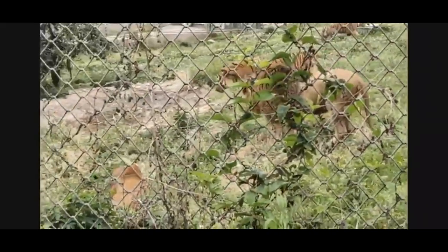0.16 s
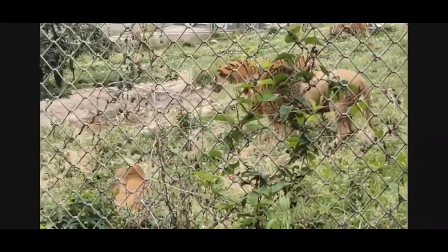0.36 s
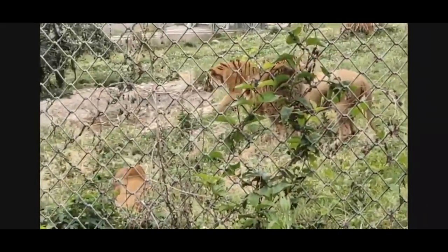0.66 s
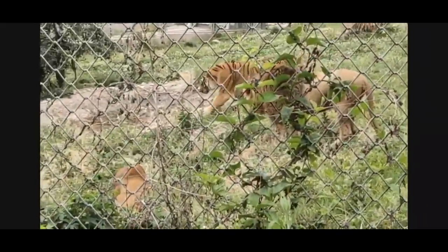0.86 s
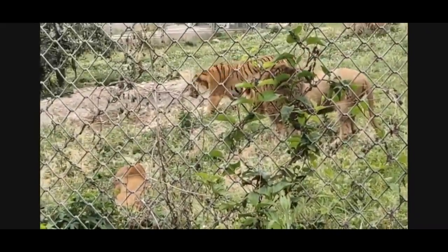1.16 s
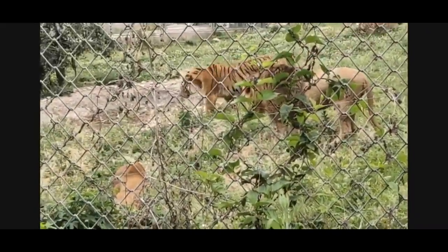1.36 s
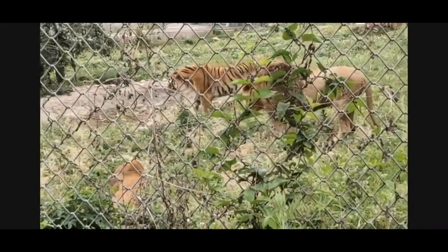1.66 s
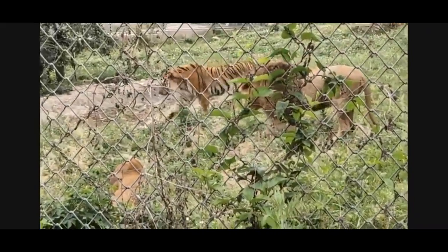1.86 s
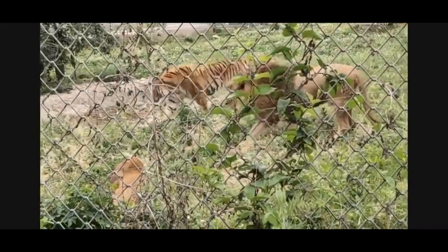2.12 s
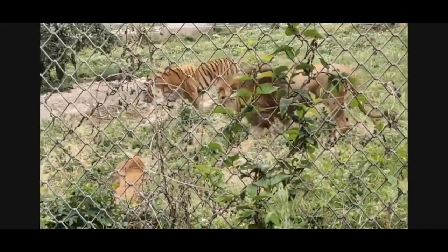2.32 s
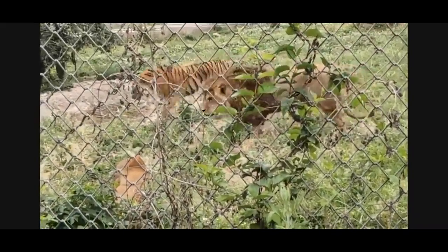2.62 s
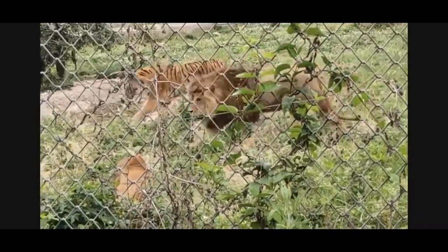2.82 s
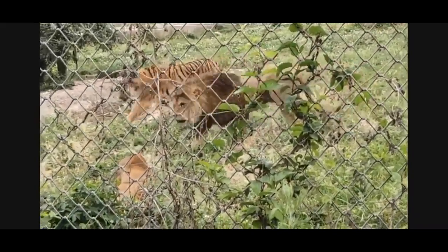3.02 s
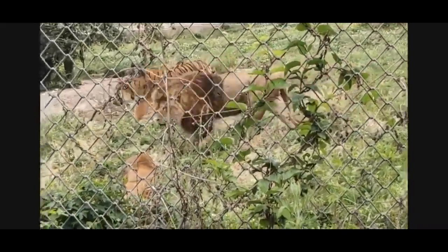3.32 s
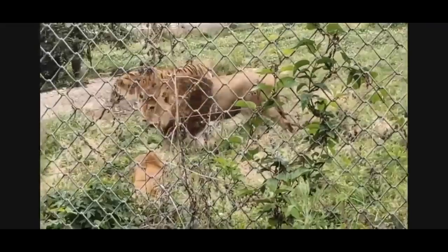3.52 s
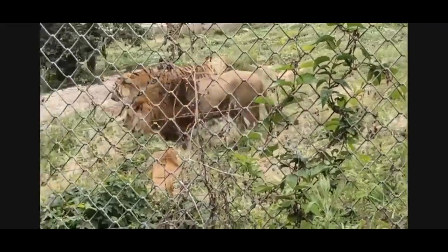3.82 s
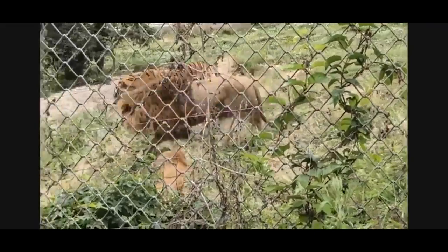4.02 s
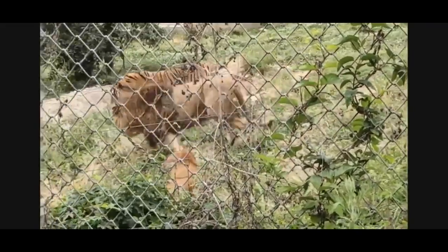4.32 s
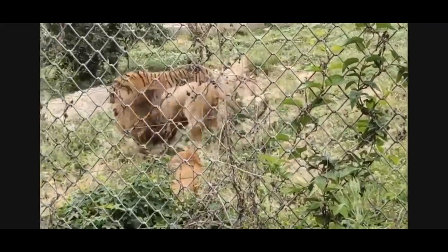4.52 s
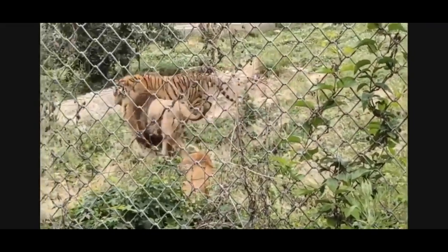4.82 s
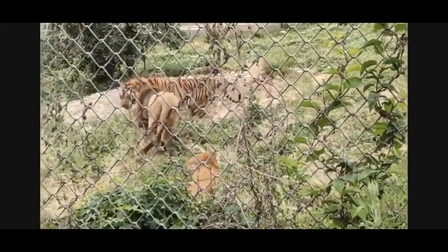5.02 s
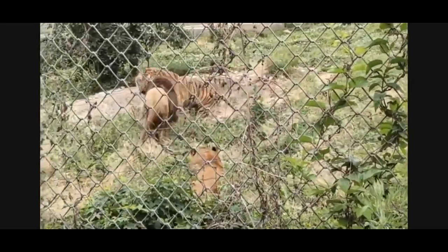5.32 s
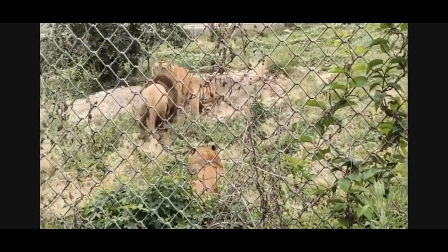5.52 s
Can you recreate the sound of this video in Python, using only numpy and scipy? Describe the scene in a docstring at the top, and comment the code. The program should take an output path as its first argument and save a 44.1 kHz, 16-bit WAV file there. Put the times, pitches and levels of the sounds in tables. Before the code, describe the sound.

Low, chesty lion grunts repeat under faint bird whistles, a hoarse moaning breath follows, then a fast snarl and an open roar cut short.

```python
"""A lion and a tiger face off in a grassy enclosure, with far birds whistling under open air and faint hiss.
Six rattling grunts come first, from slack vocal folds flapping about 28 times a second into a long throat.
Rasping in-breaths part them, air pulsed by a fluttering palate; one long breath turns into a hoarse moan.
Then the flaps quicken into a harsh snarl, and the last half second opens into a rough, pitched roar.
The enclosure answers the voices with a short echo of decaying noise."""
import sys
import numpy as np
from scipy import signal
from scipy.fft import rfft, irfft, next_fast_len
from scipy.io import wavfile
from scipy.ndimage import map_coordinates

SR = 44100
rng = np.random.default_rng(int(sys.argv[2]) if len(sys.argv) > 2 else 0)


def store_pcm(level_fs):
    """Save levels as 16-bit WAV."""
    pcm = np.round(np.clip(level_fs, -1, 1) * 32767).astype(np.int16)
    wavfile.write(sys.argv[1], SR, np.atleast_2d(pcm).T)


N = 250047  # samples, 5.67 s

# grunts: (first flap/s, end/s, flaps/Hz, chest crest/dB, throat crest/dB, mouth crest/dB)
GRUNTS = [(-.253, .13, 27, -35, -45, -49), (.591, 1.02, 28.1, -35.5, -45.5, -53),
          (1.519, 1.96, 27.9, -38.5, -49.5, -50.5), (2.321, 2.69, 27.6, -37.5, -44.5, -47),
          (3.107, 3.39, 27.1, -35.5, -47, -45), (3.979, 4.39, 28.6, -32.5, -44.5, -48.5)]
# the thump of the chest: (f/Hz, width of one pass/Hz, gain/dB)
CHEST = [(111, 54, 0)]


def amp(db):
    """Decibels to gain."""
    return 10 ** (np.asarray(db) / 20)


def clock():
    """The time of every sample in seconds."""
    return np.arange(N) / SR


def along(points, hz):
    """(f/Hz, value) points read on a log frequency axis."""
    f, v = np.transpose(points)
    return np.interp(np.log(hz + 1), np.log(f), v)


def noise():
    """White noise."""
    return rng.standard_normal(N)


def wobble(rate):
    """A smooth random curve with rate knots a second."""
    knots = rng.standard_normal(int(N * rate / SR) + 4)
    return map_coordinates(knots, [clock() * rate])


def filtered(x, response):
    """x times a complex response of frequency."""
    m = next_fast_len(N + SR // 2, True)
    return irfft(rfft(x, m) * response(np.fft.rfftfreq(m, 1 / SR)), m)[:N]


def coloured(x, spectrum, size=8192):
    """A causal filter with the given (f/Hz, gain/dB) shape, made minimum-phase by folding its cepstrum."""
    gain = amp(along(spectrum, np.fft.rfftfreq(size, 1 / SR)))
    cepstrum = irfft(np.log(gain + 1e-6))
    cepstrum[1:size // 2] *= 2
    cepstrum[size // 2 + 1:] = 0
    impulse = irfft(np.exp(rfft(cepstrum)))
    return signal.fftconvolve(x, impulse)[:N]


def resonate(x, modes):
    """Parallel resonances, each acting twice so that the valleys between them stay dark."""
    def response(f):
        return sum(amp(db) * (1j * f * w / (c * c - f * f + 1j * f * w)) ** 2 for c, w, db in modes)
    return filtered(x, response)


def played(layers, efforts, calls, rise=0.01):
    """In every call each layer swells to a crest, sags while it is held, then falls away."""
    t, out = clock(), np.zeros(N)
    for start, end, *levels in calls:
        inside = (t > start - rise) & (t < end + .02)
        age = t[inside] - start
        fade = np.interp(t[inside], [start - rise, start, end, end + .02], [0, 1, 1, 0])
        for x, (swell_db, crest, hold, sag_db, release), db in zip(layers, efforts, levels):
            effort_db = np.interp(age, [0, crest, crest + hold], [-swell_db, 0, -sag_db])
            effort_db = effort_db - release * np.maximum(age - crest - hold, 0)
            # even out the layer within this call before its level is set
            level = x[inside] / (x[inside].std() + 1e-12)
            out[inside] += level * fade * amp(db + effort_db)
    return out


def strikes(times, sizes):
    """Impulses at the given times."""
    places = np.clip(np.round(times * SR).astype(int), 0, N - 1)
    return np.bincount(places, sizes * (times >= 0), N)


def puffs(pulses, life):
    """Every pulse lets through a burst of turbulent air that dies away over life seconds."""
    t = np.arange(SR // 8) / SR
    fall = np.exp(-t / life)
    return signal.fftconvolve(pulses, fall / np.linalg.norm(fall))[:N] * noise()


def flaps(runs, scatter, scatter_db):
    """Slow slaps of the vocal folds, uneven in time by scatter seconds and in strength."""
    times = np.concatenate([np.arange(start, end, 1 / rate) for start, end, rate, *_ in runs])
    late, size = rng.standard_normal((len(times), 2)).T
    return strikes(times + scatter * late, amp(scatter_db * size))


def buzz(pitch_hz, jitter, scatter_db, alternate_db=0):
    """Pulses at an unsteady pitch; strong and weak ones may alternate."""
    cycles = np.cumsum(pitch_hz * np.exp(jitter * wobble(120))) / SR
    times = np.flatnonzero(np.diff(np.floor(cycles))) / SR
    size_db = scatter_db * rng.standard_normal(len(times))
    size_db = size_db + alternate_db * (np.arange(len(times)) % 2)
    return strikes(times, amp(size_db))


def glides(rows, waver, waver_rate):
    """Wavering sine tones that slide in pitch as they swell and fade."""
    t, out, drift = clock(), np.zeros(N), 1 + waver * wobble(waver_rate)
    for start, end, from_hz, to_hz, db in rows:
        inside = (t > start) & (t < end)
        u = (t[inside] - start) / (end - start)
        pitch_hz = (from_hz + (to_hz - from_hz) * u) * drift[inside]
        phase = 2 * np.pi * np.cumsum(pitch_hz) / SR
        out[inside] += np.sqrt(2) * amp(db) * np.sin(np.pi * u) * np.sin(phase)
    return out


def shifting(x, depth_db, width_hz, hold, size=200):
    """Narrow peaks and dips of colour come and go, each lasting about hold seconds."""
    hz, t, z = signal.stft(x, SR, nperseg=1024)
    grid = np.meshgrid(hz / width_hz, t / hold, indexing="ij")
    field = map_coordinates(rng.standard_normal((size, size)), grid, mode="wrap")
    return signal.istft(z * amp(depth_db * np.tanh(field)), SR, nperseg=1024)[1][:N]


def echo(x, decay):
    """A diffuse tail, 10 ms late, in which each frequency dies at its own speed."""
    hz, t, z = signal.stft(rng.standard_normal(SR // 2), SR, nperseg=256)
    fall = amp(-60 * t / along(decay, hz)[:, None])
    tail = signal.istft(z * fall, SR, nperseg=256)[1]
    return signal.fftconvolve(x, np.pad(tail, (SR // 100, 0)) / np.linalg.norm(tail))[:N]


def grunts():
    """Each flap thumps the chest; smaller wet flutters between flaps rattle in throat and mouth."""
    # throat with the jaw closed: (f/Hz, width of one pass/Hz, gain/dB)
    closed_throat = [(350, 33, 8.5), (379.6, 49.6, 12.5), (463, 30, -35)]
    # colour of the mouth: (f/Hz, relative level/dB)
    mouth_colour = [(360, -32), (620, -25), (725, -1.5), (897, -19.5), (1010, 4), (1200, 4), (1440, 3.5),
                    (1620, -5.5), (2010, -7), (2430, -13), (3510, -11.5), (6150, -28), (9000, -32),
                    (11700, -29), (19800, -120)]
    # effort of chest, throat, mouth: (swell/dB, time to crest/s, hold/s, sag over hold/dB, release/(dB/s))
    grunt_effort = [(4.5, .11, .15, 6, 125), (-5, .07, .19, 7.5, 230), (2, .11, .13, 9, 130)]
    # pushes within a grunt: (rate/Hz, depth/dB, first peak/s)
    throat_surge = (8.2, 3.5, .015)
    # the same columns for the mouth
    mouth_surge = (10.5, 3, .015)

    beat = flaps(GRUNTS, scatter=.0015, scatter_db=1.3)
    rattle = buzz(95, jitter=.35, scatter_db=-1)
    chest = resonate(opening(beat) + amp(-17) * rattle, CHEST)
    flow = beat + amp(-2) * puffs(beat, life=.018) + amp(-10) * rattle
    # the throat's resonance sinks as the jaw closes
    gape = jaw(closing=0.061)
    open_throat = resonate(flow, [(350, 110, 0), (492, 58, 1.5)])
    throat = gape * open_throat + (1 - gape) * resonate(flow, closed_throat)
    # air tears loose around each flap, early or late and of uneven strength
    torn = flaps(GRUNTS, scatter=.004, scatter_db=2.5)
    rasp = amp(-22) * beat + puffs(torn, life=.021) + amp(-13) * puffs(rattle, life=.004)
    # tongue and lips keep moving, so the colour changes from flap to flap
    throat = shifting(throat, depth_db=6, width_hz=80, hold=.07)
    mouth = shifting(coloured(rasp, mouth_colour), depth_db=7.5, width_hz=120, hold=.045)
    calls = [(start, end, *levels) for start, end, rate, *levels in GRUNTS]
    layers = [chest, throat * surge(*throat_surge), mouth * surge(*mouth_surge)]
    return played(layers, grunt_effort, calls)


def opening(beat):
    """The push of air comes 3 ms before the folds slap shut."""
    return np.roll(beat, -round(.003 * SR))


def jaw(closing):
    """Mouth opening, 1 at the start of each grunt and falling towards 0 over closing seconds."""
    return np.exp(-np.abs(grunt_age()) / closing)


def surge(rate, depth_db, first_peak):
    """The gain of the repeated pushes of breath within a grunt."""
    return amp(depth_db * np.cos(2 * np.pi * rate * (grunt_age() - first_peak)))


def grunt_age():
    """Seconds since the latest grunt began."""
    t, starts = clock(), np.array(GRUNTS)[:, 0]
    latest = np.maximum(np.searchsorted(starts, t) - 1, 0)
    return t - starts[latest]


def snarl():
    """Harder pressure: the folds flap faster and break into chaotic pulses."""
    # runs of fold flaps: (first flap/s, end/s, flaps/Hz)
    snarl_runs = [(4.708, 4.96, 35.3), (4.979, 5.22, 34.8)]
    # colour of the mouth: (f/Hz, relative level/dB)
    mouth_colour = [(360, -8), (620, -11), (1060, 4.5), (1700, -12), (2170, -5), (2600, -14.5),
                    (4070, -13.5), (5380, -25), (9000, -24.5), (11700, -71), (19800, -120)]
    # effort of chest, throat, mouth: (swell/dB, time to crest/s, hold/s, sag over hold/dB, release/(dB/s))
    snarl_effort = [(3, .07, .37, 7.5, 130), (8, .15, .29, 9.5, 200), (4, .25, .19, 3, 120)]
    # the call: (start/s, end/s, chest crest/dB, throat crest/dB, mouth crest/dB)
    snarl_call = (4.708, 5.23, -29.5, -30.5, -49)

    beat = flaps(snarl_runs, scatter=0.00114, scatter_db=-0.5)
    rattle = buzz(115, jitter=.2, scatter_db=4)
    chest = resonate(opening(beat) + amp(-11.5) * rattle, [(112.7, 50, 0)])
    throat_modes = [(252, 40, -13), (370.4, 102, 8.5), (454, 32, 1.5)]
    throat = resonate(beat + amp(-6) * rattle, throat_modes)
    rasp = amp(-9) * beat + puffs(beat, life=0.019) + amp(-9.5) * puffs(rattle, life=0.0084)
    throat = shifting(throat, depth_db=5, width_hz=80, hold=.06)
    mouth = shifting(coloured(rasp, mouth_colour), depth_db=7, width_hz=110, hold=.06)
    return played([chest, throat, mouth], snarl_effort, [snarl_call])


def roar():
    """The jaws open wide: a rough, pitched voice with a half-pitch undertone and air torn once a cycle."""
    # pitch before jitter: (t/s, f/Hz)
    roar_pitch = [(5.33, 134.7), (5.4, 146.1), (5.451, 158.7), (5.502, 146.7), (5.56, 141.5),
                  (5.619, 136.8)]
    # colours of chest, throat and mouth, each: (f/Hz, relative level/dB)
    chest_colour = [(24, -49), (40, -20), (56, -19), (107, -1), (145, -3), (205, -2), (280, -9), (360, -37),
                    (620, -120)]
    throat_colour = [(150, -56.5), (260, -12.5), (323, -3), (426, -0.5), (585, -18), (702, -10.5),
                     (820, -12), (902, -25), (980, -18.5), (1270, -61), (2160, -120)]
    mouth_colour = [(560, -30), (950, -11.5), (1200, 3), (1320, -4.5), (1460, -3.5), (2240, -8.5),
                    (2700, -13.5), (3140, -8), (4530, -15), (9000, -31), (11700, -73), (19800, -120)]
    # effort of chest, throat, mouth: (swell/dB, time to crest/s, hold/s, sag over hold/dB, release/(dB/s))
    roar_effort = [(21, .16, .22, -.5, 50), (24, .11, .29, -2, 10), (17, .2, .2, -1, 30)]
    # the call: (start/s, end/s, chest crest/dB, throat crest/dB, mouth crest/dB)
    roar_call = (5.23, 5.67, -27, -33, -43)

    pitch_hz = np.interp(clock(), *np.transpose(roar_pitch))
    # every second pulse is stronger, which sounds the undertone
    pulses = buzz(pitch_hz, jitter=.05, scatter_db=1.5, alternate_db=6)
    chest = coloured(pulses + amp(-9) * puffs(pulses, life=.006), chest_colour)
    throat = coloured(pulses + amp(-4) * puffs(pulses, life=.005), throat_colour)
    mouth = coloured(amp(-7) * pulses + puffs(pulses, life=.009), mouth_colour)
    mouth = shifting(mouth, depth_db=4, width_hz=100, hold=.08)
    return played([chest, throat, mouth], roar_effort, [roar_call])


def slaps():
    """Now and then the folds shut hard: a knock in the throat and a crack in the mouth."""
    # hard slaps: (t/s, relative throat level/dB, relative mouth level/dB)
    hard_slaps = [(0.668, -38, -42), (0.842, -36, -43), (1.519, -35, -34.5), (1.591, -39, -41),
                  (2.322, -36, -44), (2.357, -34, -36), (3.106, -33, -35), (4.253, -36, -45),
                  (4.849, -21, -48), (4.871, -23, -45), (4.979, -22, -31), (5.093, -29, -45)]
    # colour of the crack: (f/Hz, gain/dB)
    crack_colour = [(500, -32), (800, -21), (1100, 13.5), (1500, 4.5), (2200, -23.5), (4200, -28),
                    (7000, -46)]

    s, throat_db, mouth_db = np.transpose(hard_slaps)
    knock = resonate(strikes(s, amp(throat_db + 32)), [(380, 320, 0)])
    crack = strikes(s, amp(mouth_db + 17.5))
    return knock + coloured(crack + amp(10) * puffs(crack, life=0.012), crack_colour)


def lead_in():
    """A lone soft flap ahead of a grunt thumps only the chest."""
    # the flap: (t/s, peak level/dB)
    soft_flap = (1.489, -36)
    s, db = soft_flap
    thump = resonate(strikes(np.array([s]), 1), CHEST)
    return amp(db) * thump / np.abs(thump).max()


def breaths():
    """The cat drags air in past a fluttering palate; one long breath turns into a hoarse moan."""
    # in-breaths: (start/s, flutter crest/dB, air crest/dB)
    in_breaths = [(.26, -69, -70), (.41, -44, -55), (1.335, -62, -65), (2.15, -59, -58),
                  (2.935, -56, -58.5), (4.495, -39, -45.5)]
    # the long breath: (start/s, end/s, flutter crest/dB, air crest/dB)
    moan_call = (3.41, 3.955, -59, -52)
    # colours of flutter, drawn air and moan, each: (f/Hz, relative level/dB)
    flutter_colour = [(30, -25), (105, -8), (145, -2), (300, -36), (600, -74.5)]
    air_colour = [(140, -30), (230, -43.5), (322, -5), (480, -9), (605, -32), (847, -15), (1800, -29),
                  (2850, -47.5), (3070, -37.5), (9000, -50.5), (11700, -86), (19800, -120)]
    moan_colour = [(140, -28), (230, -13.5), (543, -3), (643, -20), (861, -10), (1050, -23), (1150, -26.5),
                   (1430, -17), (1690, -45.5), (3420, -36.5), (8460, -52), (9000, -59), (11700, -88),
                   (19800, -120)]
    # effort of flutter, air: (swell/dB, time to crest/s, hold/s, sag over hold/dB, release/(dB/s))
    breath_effort = [(20, .1, .045, 1, 230), (11, .085, .04, 1, 130)]
    # the same columns for the moan
    moan_effort = [(1, .1, .3, 1, -40), (5, .38, .04, 1, 70)]
    breath_s = .18  # length of every in-breath

    pulses = buzz(128, jitter=.13, scatter_db=1.5)
    flutter = coloured(pulses + amp(1) * puffs(pulses, life=0.013), flutter_colour)
    air = coloured(puffs(pulses, life=.012), air_colour)
    air = shifting(air, depth_db=6, width_hz=80, hold=.1)
    hoarse = shifting(coloured(noise(), moan_colour), depth_db=5.5, width_hz=55, hold=.15)
    calls = [(start, start + breath_s, *levels) for start, *levels in in_breaths]
    drawn = played([flutter, air], breath_effort, calls, rise=.05)
    return drawn + played([flutter, hoarse], moan_effort, [moan_call])


def wheezes():
    """Unsteady, broken tones, mostly from a narrowed throat; one near 1 kHz rings on after the second grunt."""
    # thin tones: (start/s, end/s, from f/Hz, to f/Hz, crest level before flicker/dB)
    thin_tones = [(.14, .44, 134.6, 200, -64.5), (1.7, 1.99, 1040, 1010, -68),
                  (3.56, 3.85, 1015, 1030, -62), (3.76, 3.86, 540, 554, -49), (4.795, 4.84, 168, 327, -34),
                  (4.92, 4.975, 620, 1150, -48), (4.935, 4.995, 200, 287, -34.5)]
    return glides(thin_tones, waver=.014, waver_rate=80) * amp(3.5 * wobble(70))


def hiss():
    """A thin, flickering top hiss that swells, mostly around the calls, over a resting level."""
    # colour of the hiss: (f/Hz, relative level/dB)
    hiss_colour = [(8000, -63), (9500, -9), (11500, 0.5), (14000, 4), (15400, 0.5)]
    # swells: (crest/s, hold/s, level/dB)
    hiss_swells = [(.21, .07, -72), (.8, .08, -69), (1.55, .17, -71), (2.42, .12, -69.5), (3.18, .08, -64),
                   (3.43, .13, -67), (4.07, .06, -59.5), (4.57, .03, -58.5), (4.77, .11, -56),
                   (5.1, .23, -59), (5.42, .25, -48)]
    rise_db_per_s, fall_db_per_s, rest_db = 125, 85, -83.5

    top = shifting(coloured(noise(), hiss_colour), depth_db=6, width_hz=160, hold=.05)
    t, power = clock(), amp(rest_db) ** 2
    for crest, hold, db in hiss_swells:
        before, after = np.maximum(crest - t, 0), np.maximum(t - crest - hold, 0)
        below_db = rise_db_per_s * before + fall_db_per_s * after
        power = power + amp(db - below_db) ** 2
    return top / top.std() * np.sqrt(power)


def birds():
    """Far reedy whistles and a low coo: gliding, wavering tones blurred by the trees."""
    # calls: (start/s, end/s, from f/Hz, to f/Hz, relative crest level/dB)
    bird_calls = [(0, .16, 2120, 2220, -66), (.12, .4, 500, 420, -64), (.25, .42, 3560, 3580, -71),
                  (.28, .56, 2900, 2816, -59.5), (.33, .66, 2650, 2300, -62), (1.02, 1.28, 3070, 2820, -65),
                  (1.1, 1.36, 444, 488, -62), (1.25, 1.52, 2900, 3100, -65), (2.04, 2.16, 650, 650, -63)]
    # echo of the trees: (f/Hz, time to fall 60 dB/s)
    tree_decay = [(500, 0.66), (4000, 0.43)]
    song = glides(bird_calls, waver=.029, waver_rate=400)
    return amp(-9) * song + amp(-10.5) * echo(song, tree_decay)


def outdoors():
    """Faint, slowly shifting open air made of coloured noise."""
    # colour of the open air: (f/Hz, relative level/dB)
    floor_colour = [(15, -13), (25, -5.5), (86, -8.5), (286, -19), (394, -13.5), (748, -21), (1420, -34),
                    (2160, -22.5), (4860, -35), (9000, -32.5), (11700, -63), (19800, -120)]
    air = shifting(coloured(noise(), floor_colour), depth_db=8, width_hz=80, hold=.15)
    return amp(-76 + 1.1 * wobble(3.5)) * air / air.std()


def scene():
    """The cats with their echo, the hiss, the birds and the open air."""
    # echo of the enclosure: (f/Hz, time to fall 60 dB/s)
    enclosure_decay = [(120, .45), (1000, 0.23), (4000, 0.62), (12000, 0.14)]
    cats = grunts() + snarl() + roar() + slaps() + lead_in() + breaths() + wheezes()
    reflected = amp(-11.5) * echo(cats, enclosure_decay)
    return (cats + reflected + hiss() + birds() + outdoors())[None]


def record(dry):
    """A steep band limit removes everything from top_hz upwards."""
    top_hz = 15450
    return filtered(dry[0], lambda hz: hz < top_hz)[None]


dry = scene()
out = record(dry)
store_pcm(out)
```